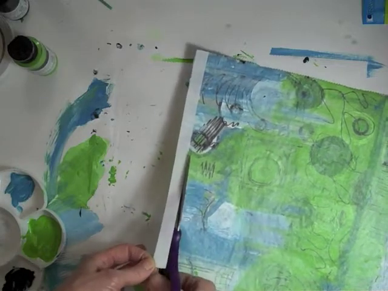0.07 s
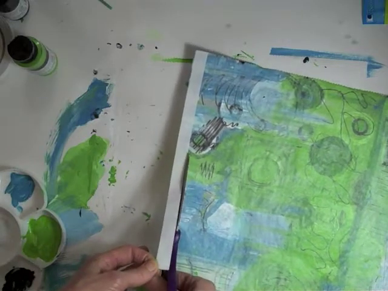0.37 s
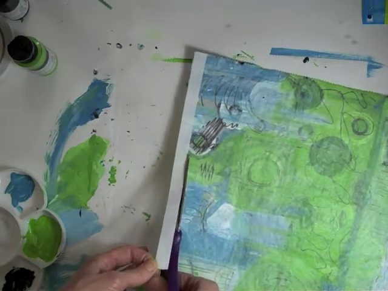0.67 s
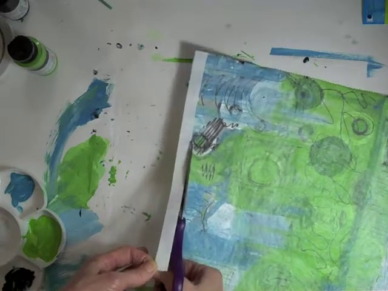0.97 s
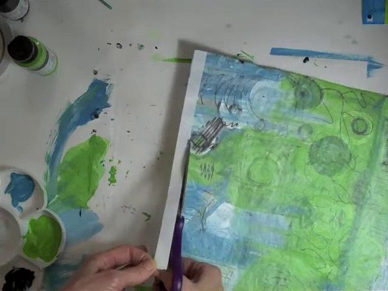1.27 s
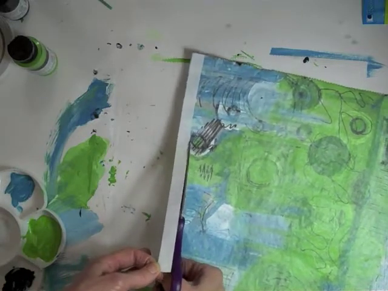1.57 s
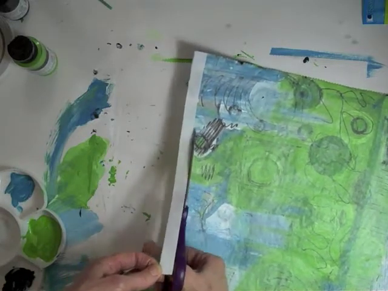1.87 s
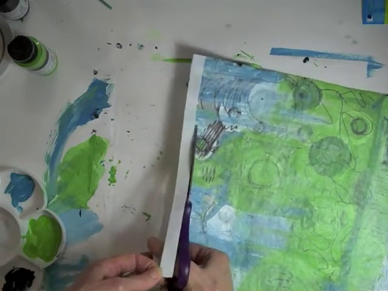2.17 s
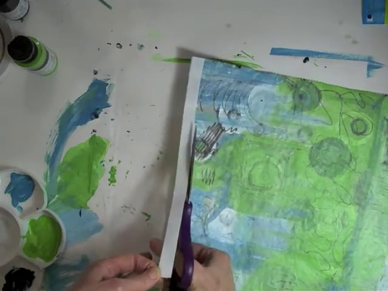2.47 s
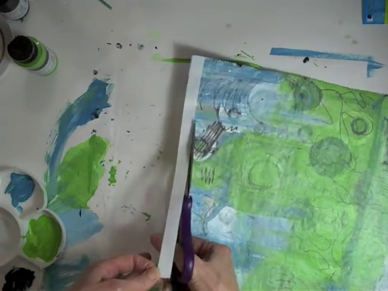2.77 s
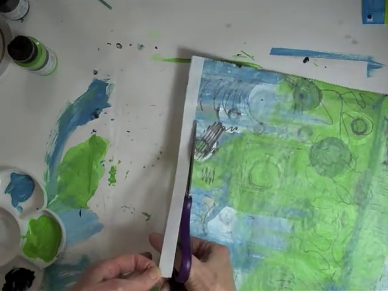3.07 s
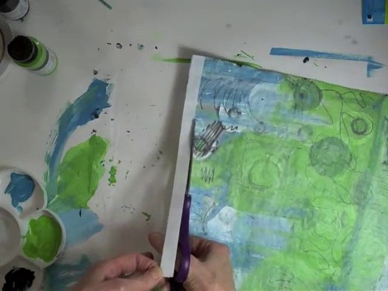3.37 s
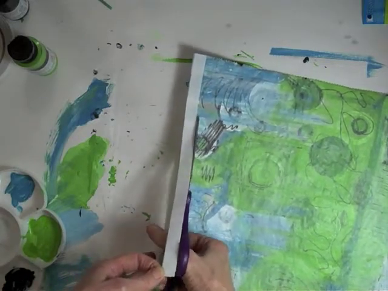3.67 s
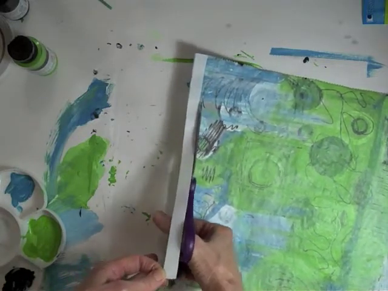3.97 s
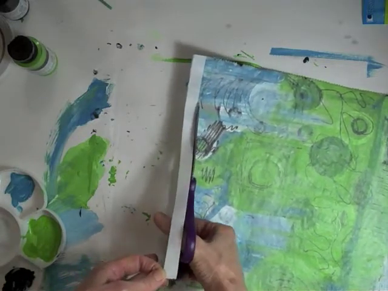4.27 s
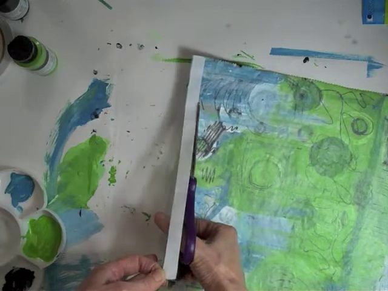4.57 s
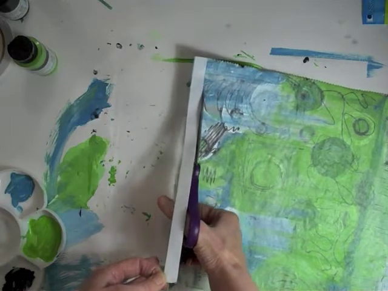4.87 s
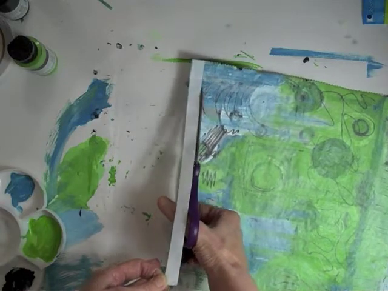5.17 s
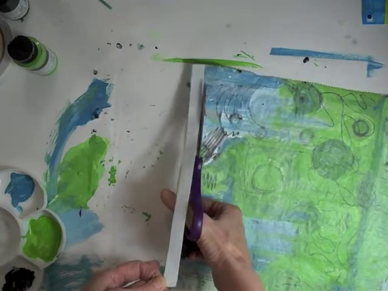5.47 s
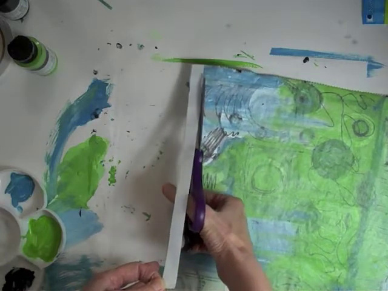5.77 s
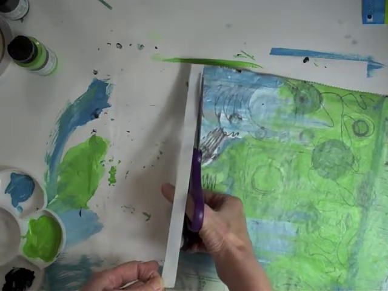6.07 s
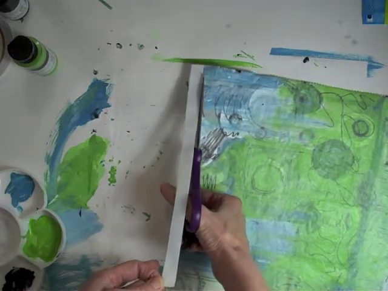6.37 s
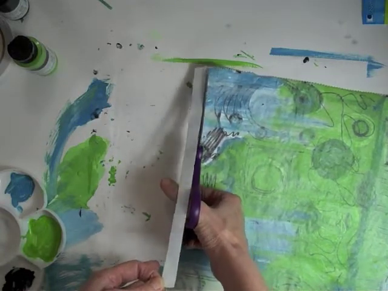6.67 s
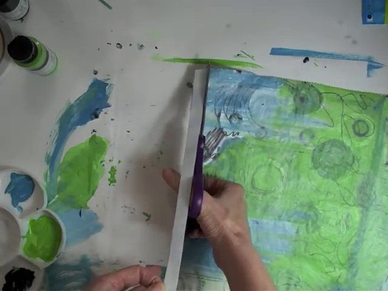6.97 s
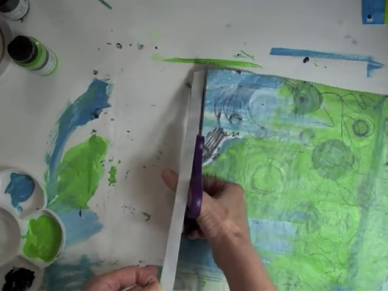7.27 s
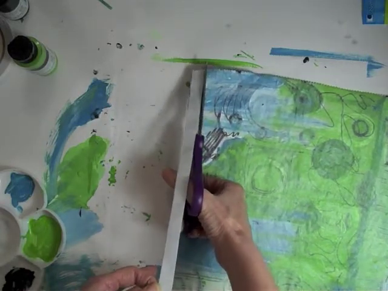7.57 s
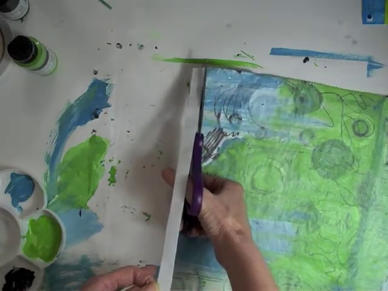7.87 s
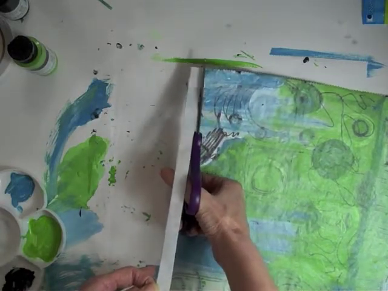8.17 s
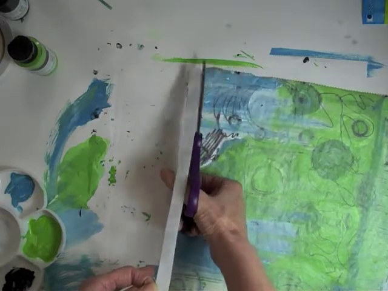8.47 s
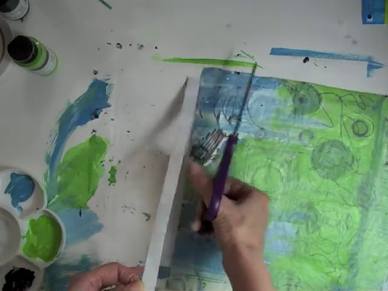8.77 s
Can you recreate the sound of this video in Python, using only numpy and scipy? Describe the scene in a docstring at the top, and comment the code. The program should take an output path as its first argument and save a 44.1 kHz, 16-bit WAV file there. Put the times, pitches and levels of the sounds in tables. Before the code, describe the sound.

Scissors cut slowly through a stiff painted sheet at a table, quiet and fairly close in stereo, with slight room reverberation and a faint steady hiss. Light scrapes and ticks lead to a first soft crunching cut at about 0.7 seconds. The open blades slide on, catching and squeaking, and close again at 1.7 seconds. The sheet rustles lightly until about 3.2 seconds, when scraping resumes. Further cuts come at 3.6, 4.6, 5.3 and 6.6 seconds, each preceded by dry rubbing and tiny squeaks and surrounded by crisp snaps of buckling paper. Each cut lasts about a third of a second, starting bright and turning hollow as it fades toward the blade tips; the last rings slightly higher. A small scrape at 7 seconds gives way to a lull. Around 8.3 seconds the blades scrape once more with a few clicks, and the paper rustles softly until nearly 9 seconds.

```python
"""A stiff painted sheet rustles and steel blades scrape its edge: scissors trim off a strip at a table.
Pushed along the cut, the open blades rub, catch and squeak by stick-slip friction. Six times they close
with a soft crunch of breaking fibres, which fades and turns hollow toward the tips as the resonances of
sheet and blades take over. The held sheet buckles with snaps and crackles. Two microphones pick up
the sound with the short reverberation of a quiet room, over a faint hiss."""
import sys
import numpy as np
from scipy import signal
from scipy.fft import rfft, irfft
from scipy.io import wavfile
from scipy.ndimage import uniform_filter1d, map_coordinates

SR = 44100
rng = np.random.default_rng(int(sys.argv[2]) if len(sys.argv) > 2 else 0)


def dump_mix(stems):
    """Bounce the given channels to the path in sys.argv[1] as a 16-bit WAV at rate SR."""
    frames = np.atleast_2d(stems).T  # one column per channel
    limited = np.clip(frames, -1, 1)  # hard clip at full scale
    pcm = np.round(limited * 32767).astype(np.int16)
    wavfile.write(sys.argv[1], SR, pcm)


N = 389667
HZ = np.fft.rfftfreq(2048, 1 / SR)

# Spectrum of parting fibres. Each row: frequency in Hz, relative spectral level in dB.
FRACTURE_SPECTRUM = [(100, -16), (400, -11.5), (1000, -9), (1500, -10), (2600, -9), (3250, -5),
                     (4000, -4.5), (4400, -2.5), (5300, -3.5), (6000, 0.5), (7100, 2), (8500, -7.5),
                     (11000, -20.5), (14500, -27)]
# Spectrum of rubbed paper. Each row: frequency in Hz, relative spectral level in dB.
FRICTION_SPECTRUM = [(100, -46), (500, -13.5), (1000, -7.5), (1600, -4), (2500, -7.5), (3200, -3.5),
                     (3900, -6.5), (4700, -2.5), (5400, -6), (6500, -0.5), (7500, -2.5), (9000, -13),
                     (11000, -19.5), (14500, -23.5)]
# The sheet's lowest mode rises as the uncut part shortens. Each row: time in seconds, frequency in Hz.
SHEET_MODE = [(0, 1640), (1.8, 1760), (3.8, 1710), (4.7, 1730), (5.5, 1810), (6.8, 2220), (8.4, 2190)]
# The open blades advance along the cut.
# Each row: start and length in seconds, level in dB, boosts of sheet resonance and treble fizz in dB.
PUSHES = [(0.227, 0.13, -54, 5, 8), (0.376, .075, -53, 1.5, 1.5), (0.482, 0.1, -55.5, -1.5, 1),
          (1.265, .13, -50.5, 3, 3.5), (1.403, 0.087, -52, 6, 2), (1.513, 0.047, -50, 7, 12.5),
          (1.655, 0.13, -49.5, 6.5, 3.5), (3.25, .19, -50.5, -1.5, -1.5), (3.465, 0.06, -51, -2, 7),
          (3.586, 0.047, -54, 7, 4), (4.27, 0.11, -50, 0.5, 0), (4.381, 0.052, -46, -6, 4.5),
          (4.549, 0.035, -54.5, 14, 4), (5.057, .12, -46.5, -0.5, 3.5), (6.338, 0.19, -49.5, 1, 4.5),
          (7.004, 0.066, -48.5, -3, 3.5), (8.299, 0.14, -50, -5, 9.5)]


def cut(start, hold_s, run_out_s, db, first_db, tips_db, blade_db):
    """Shear fracture: parting fibres excite sheet and blades, whose resonances gain toward the tips."""
    bite_s, grip_hz = .03, 27.8
    t = np.arange(-bite_s / 2, hold_s + run_out_s, 1 / SR)
    middle = start + t.mean()
    closed = np.clip(t / t[-1], 0, 1)
    breaks = fibre_impulses(len(t), per_s=9000, spread_db=3, clump_db=1.44, clump_hz=216.3)
    colour = spectrum(FRACTURE_SPECTRUM) + sheet_colour(middle, ring_db=.5)
    crunch = bending(breaks, colour, ripple_db=2.44)[:, :len(t)]
    # The resonances come and go as the sheet bends.
    sheet_db = first_db + (tips_db - first_db) * closed + 2 * wander(len(t), grip_hz)
    blades_db = blade_db + 2 * closed ** 2 + 2 * wander(len(t), grip_hz)
    sheet = resonance(crunch, sheet_mode_hz(middle), width_hz=500, boost_db=sheet_db)
    blades = resonance(crunch, 3270, width_hz=580, boost_db=blades_db)
    fizz = resonance(crunch, 9500, width_hz=5500, boost_db=2 - 1.5 * closed)  # brightest at the pivot
    sliding = np.clip(.5 - t / bite_s, 0, 1)  # falls to 0 as the blades bite
    run_out = np.maximum(t - hold_s, 0) / run_out_s
    force_db = db - 10 * sliding - 16.5 * run_out + .3 * wander(len(t), grip_hz)  # an uneven hand
    envelope = gain_of(force_db) * signal.windows.tukey(len(t), .04)
    return start + t[0], (crunch + sheet + blades + fizz) * envelope


def push(start, length, db, body_db, fizz_db):
    """Sliding friction: the open blades rub the cut edge in uneven fits."""
    envelope = swell(length, rise_s=.005, release_s=.0083)
    slips = envelope * fibre_impulses(len(envelope), per_s=3500, spread_db=3.5, clump_db=3,
                                      clump_hz=131.5)
    colour = friction_colour(start, body_db, squeak_db=4, fizz_db=fizz_db)
    return start, gain_of(db) * bending(slips, colour, ripple_db=3)


def scrape(start, length, db, squeak_db, release_s=.0032):
    """Stick-slip: a blade catches the edge and squeaks, with the body and fizz of the nearest push."""
    body_db, fizz_db = min(PUSHES, key=lambda row: abs(row[0] + row[1] / 2 - start))[-2:]
    t = np.arange(int(.09 * SR)) / SR
    rise_s = .22 * length
    envelope = np.minimum(t / rise_s, 1) * np.exp(-np.maximum(t - length - rise_s / 2, 0) / release_s)
    slips = envelope * fibre_impulses(len(t), per_s=5000, spread_db=3, clump_db=1.5, clump_hz=294)
    slips *= np.linalg.norm(envelope) / np.linalg.norm(slips)
    colour = friction_colour(start, body_db, squeak_db, fizz_db)
    return start - rise_s / 2, gain_of(db + 0) * radiate(slips, colour, ripple_db=2.5)


def snap(start, db, hz, t60):
    """Buckling: a crack and a damped rattle; large patches of paper sound low, small ones high."""
    t = np.arange(int(.05 * SR)) / SR
    rattle = rng.standard_normal(len(t)) * gain_of(-60 * t / t60)
    crack = gain_of(9) * (t == 0)
    octaves = .67 * min(1, (.012 / t60) ** .42)  # a longer ring is narrower
    colour = .94 * spectrum(FRICTION_SPECTRUM) + sheet_colour(start, ring_db=2, below_db=-2)
    colour += 16 * bell(hz, octaves)
    sound = radiate(rattle + crack, colour, ripple_db=1.9, echo_db=-12)
    return start, gain_of(db) * np.sqrt(.01 * SR) * sound / np.linalg.norm(sound)


def rustle(start, length, db, hz):
    """Crackling noise: the shifting sheet emits sparse clicks, strongest where the bent patch rings."""
    envelope = swell(length, rise_s=.011, release_s=.02)
    crackle = envelope * fibre_impulses(len(envelope), per_s=2700, spread_db=3, clump_db=2.5,
                                        clump_hz=94.4)
    paper = .5 * (spectrum(FRICTION_SPECTRUM) + spectrum(FRACTURE_SPECTRUM))
    colour = paper + sheet_colour(start, ring_db=4.5) + 6 * bell(hz, octaves=.54)
    return start, gain_of(db) * bending(crackle, colour, ripple_db=3)


def fibre_impulses(count, per_s, spread_db, clump_db, clump_hz):
    """Shot noise: tiny fibre breaks at random instants, their sizes swelling in clumps; rms 1."""
    breaks = rng.random(count) < per_s / SR
    size = np.minimum(rng.exponential(1, count), 4)
    sign = rng.choice([-1, 1], count)
    return unit_rms(breaks * sign * gain_of(spread_db * size + clump_db * wander(count, clump_hz)))


def friction_colour(time, body_db, squeak_db, fizz_db):
    """Friction spectrum of steel on paper in dB: rub, sheet resonance, narrow squeak and treble fizz."""
    squeak = squeak_db * bell(5720, octaves=.07)
    fizz = fizz_db * bell(10900, octaves=.98)
    return spectrum(FRICTION_SPECTRUM) + sheet_colour(time, body_db) + squeak + fizz


def sheet_mode_hz(time):
    """Natural frequency of the sheet's lowest mode at the given time."""
    return np.interp(time, *np.transpose(SHEET_MODE))


def sheet_colour(time, ring_db, below_db=-8):
    """Plate radiation in dB: the sheet rings at its lowest mode and radiates poorly below it."""
    hz = sheet_mode_hz(time)
    below_mode = .5 - .5 * np.tanh(np.log((HZ + 1) / (.78 * hz)) / .11)
    return below_db * below_mode + ring_db * bell(hz, octaves=.5)


def resonance(x, hz, width_hz, boost_db):
    """Second-order resonance: the band which, added to x, changes its level at hz by boost_db."""
    return (gain_of(boost_db) - 1) * signal.lfilter(*signal.iirpeak(hz, hz / width_hz, fs=SR), x)


def bending(x, colour_db, ripple_db, size=8192):
    """Time-varying response: peaks and dips move as the sheet bends, in overlapping windows."""
    hop = size // 2
    sound = np.zeros((2, len(x) + size))
    x = np.pad(x, (hop, size))
    for at in range(0, len(x) - size, hop):
        piece = radiate(x[at:at + size] * signal.windows.hann(size), colour_db, ripple_db)
        add(sound, (at - hop) / SR, piece if at else piece[:, hop:])
    return sound


def radiate(x, colour_db, ripple_db, echo_db=-9, echo_t60=.033):
    """Unit-energy response of one bend: its own peaks and dips, and early echoes to each microphone."""
    ripple = rng.standard_normal(len(HZ))
    ripple = unit_rms(uniform_filter1d(uniform_filter1d(ripple, size=12), size=8))
    t = np.arange(len(HZ)) / SR
    highpass = signal.butter(1, 1800, "highpass", fs=SR)  # small surfaces reflect only short waves
    echoes = signal.lfilter(*highpass, rng.standard_normal((2, len(t))))
    echoes *= gain_of(-60 * t / echo_t60) * (t > .0004)
    paths = (t == 0) + gain_of(echo_db) * unit_rms(echoes) / np.sqrt(len(t))
    sheet = minimum_phase(colour_db + ripple_db * ripple)
    responses = signal.fftconvolve(sheet[None], paths, axes=1)[:, :len(t)]
    return signal.fftconvolve(x[None], unit_rms(responses) / np.sqrt(len(t)), axes=1)


def room_path(x, side, tail_db=-15):
    """Reverberation: direct sound and a faint tail reach one microphone; side > 0 is the left."""
    # Decay of the room. Each row: frequency in Hz, time to fall 60 dB in seconds.
    decay_times = [(300, 0.14), (2000, 0.27), (6000, 0.3), (14000, 0.14)]
    # The left microphone is brighter. Each row: frequency in Hz, leftward bias in dB before weighting.
    left_bias = [(200, -7), (1500, 1), (3200, 1), (6000, 0), (7000, 9.5), (7800, 9), (10000, 15),
                 (14000, 36.5)]
    # The treble arrives out of step. Each row: frequency in Hz, left lead in radians before weighting.
    left_lead = [(5900, -0.38), (6900, 0.98), (8400, -1.43), (12000, -0.65)]
    t = np.arange(SR // 2) / SR
    hz, times, bands = signal.stft(rng.standard_normal(len(t)) * (t > .005), SR, nperseg=256)
    bands *= gain_of(-60 * times / spectrum(decay_times, hz)[:, None])
    tail = signal.istft(bands, SR, nperseg=256)[1][:len(t)]
    path = (t == 0) + gain_of(tail_db) * tail / np.linalg.norm(tail)
    lean = gain_of(side * spectrum(left_bias))
    response = 2 * lean / (1 + lean) * np.exp(.5j * side * spectrum(left_lead))
    microphone = np.fft.fftshift(irfft(response))[1:]
    return signal.fftconvolve(signal.fftconvolve(x, path)[:N], microphone, "same")


def hiss():
    """Stationary noise of room air and microphones: opposed in the deep bass, uncorrelated above."""
    # Noise spectrum in each microphone. Each row: frequency in Hz, relative spectral level in dB.
    left_spectrum = [(20, 3), (60, -2), (130, -1), (350, 0), (700, -1.5), (1500, -5), (3000, -9),
                     (6000, -12.5), (7400, -11), (9000, -14), (14500, -15.5)]
    right_spectrum = [(20, -1), (60, 1.5), (130, -8), (350, -8), (1000, -10), (3000, -12.5), (6000, -12.5),
                      (9000, -13.5), (14500, -13.5)]
    # Noise level in dB: left, then right.
    levels_db = [-58, -62]
    # Likeness of the channels. Each row: frequency in Hz, correlation from -1 to 1.
    likeness = [(25, -.85), (60, -0.65), (130, -0.47), (400, 0.018)]
    hz = np.fft.rfftfreq(N, 1 / SR)
    left, independent = rfft(rng.standard_normal((2, N)))
    correlation = spectrum(likeness, hz)
    right = correlation * left + np.sqrt(1 - correlation ** 2) * independent
    channels = zip((left, right), (left_spectrum, right_spectrum), levels_db)
    return np.array([gain_of(db) * unit_rms(irfft(noise * gain_of(spectrum(colour, hz)), N))
                     for noise, colour, db in channels])


def minimum_phase(db):
    """Causal impulse response with the given gain: it rings only after the blow."""
    log_gain = np.log(gain_of(np.r_[db, db[-2:0:-1]]))
    return np.fft.ifft(np.exp(np.conj(signal.hilbert(log_gain)))).real[:len(HZ)]


def swell(length, rise_s, release_s):
    """Envelope of a movement: linear rise, hold and exponential decay."""
    t = np.arange(0, length + .15, 1 / SR)
    return np.minimum(t / rise_s, 1) * np.exp(-np.maximum(t - length, 0) / release_s)


def wander(count, rate_hz):
    """Smooth random modulation of rms near 1."""
    position = np.arange(count) / SR * rate_hz
    return map_coordinates(rng.standard_normal(4096), [position], order=2, mode="wrap")


def spectrum(points, hz=HZ):
    """Interpolates a table on a log-frequency axis."""
    frequencies, values = np.transpose(points)
    return np.interp(np.log(hz + 1), np.log(frequencies + 1), values)


def bell(hz, octaves):
    """Gaussian peak of height 1 over log frequency."""
    return np.exp(-.5 * (np.log2((HZ + 1) / hz) / octaves) ** 2)


def gain_of(db):
    """Decibels to an amplitude ratio."""
    return 10 ** (np.asarray(db) / 20)


def unit_rms(x):
    """Scales to rms 1."""
    return x / np.sqrt(np.mean(x ** 2) + 1e-20)


def add(mix, start, sound):
    """Superposes a two-channel sound from start, in seconds."""
    part = mix[:, max(round(start * SR), 0):][:, :sound.shape[1]]
    part += sound[:, :part.shape[1]]


def scene():
    """Superposition: all paper sounds come from one spot on the table and share its room paths."""
    # The blades close. Each row: start, steady bite and run-out in seconds, level in dB,
    # boosts in dB of the sheet resonance at first and at the tips, and of the blade resonance.
    cuts = [(0.745, 0.13, 0.16, -46, 6.5, 9, 3), (1.69, 0.17, 0.22, -48, 4.5, 14.5, 9),
            (3.578, 0.2, 0.21, -45.5, 3.5, 16.5, 5.5), (4.559, 0.28, 0.096, -49.5, 0.5, 14.5, 3),
            (5.335, 0.13, 0.18, -47.5, 5, 9.5, 6.5), (6.6, 0.16, 0.195, -44, -10, 19, 3.5)]
    # A blade catches and slips. Each row: start and length in seconds, level and squeak boost in dB.
    scrapes = [(0.141, 0.0083, -46, -3), (0.23, 0.012, -47.5, -1), (0.311, .018, -49.5, 9),
               (0.379, 0.012, -43.5, -1), (0.402, 0.0097, -47, 23), (0.423, 0.014, -47.5, 17),
               (0.528, 0.015, -39.5, 12.5), (0.547, 0.018, -50, 5), (0.986, 0.03, -51.5, 32),
               (1.363, 0.029, -50.5, 5), (1.411, 0.0048, -40.5, 19), (1.427, 0.02, -52, 18),
               (1.462, .024, -41.5, 22), (1.498, 0.0066, -40, 15), (1.507, .042, -40, 9.5),
               (1.268, .019, -51, -4), (1.671, 0.029, -40.5, -5), (1.734, 0.012, -37.5, -7),
               (1.75, 0.0094, -39, 3), (2.787, 0.0091, -44.5, -5), (2.981, 0.0091, -52, -10),
               (3.012, 0.021, -47.5, -5), (3.174, 0.011, -43.5, 1), (3.294, 0.015, -38.5, 8),
               (3.321, 0.01, -45, 2), (3.343, 0.044, -46, 8), (3.402, 0.0069, -45, 0),
               (3.425, 0.0041, -39.5, 12), (3.467, 0.038, -43.5, 6), (3.6, 0.017, -39.5, 10),
               (4.274, .015, -33.5, 6), (4.297, 0.011, -43, 9), (4.343, .017, -38.5, 21),
               (4.379, 0.023, -35, 9), (4.406, .028, -38.5, 6), (4.563, .018, -43.5, 16),
               (5.064, .016, -41, 11), (5.088, .011, -46, 3), (5.112, 0.012, -36, 18),
               (5.129, .019, -43, 1), (5.149, 0.0084, -41, 7), (5.274, 0.0124, -45, 3),
               (5.295, 0.0097, -42, -7), (6.107, 0.0083, -52.5, 0), (6.339, 0.028, -47.5, 17),
               (6.393, 0.0084, -42, 9), (6.438, 0.011, -36.5, 9), (6.459, 0.0096, -35, 12),
               (7.029, 0.028, -46, 3), (8.311, .028, -45, 9), (8.357, 0.00805, -36, 5),
               (8.4, 0.0064, -46, 6), (8.421, .008, -38.5, 13), (8.588, 0.0079, -49, 3)]
    # The sheet buckles or slips off a blade. Each row: start in seconds,
    # level in dB (energy spread over 10 ms), centre in Hz, time to fall 60 dB in seconds.
    snaps = [(0.096, -52, 5470, 0.0035), (0.616, -54, 5530, .006), (0.553, -45, 6000, .004),
             (0.7052, -39.5, 3050, .003), (0.7425, -39, 4260, 0.0048), (1.002, -41, 6300, .004),
             (1.1786, -49.5, 4670, .007), (1.2818, -47, 5000, .004), (1.443, -34, 1660, 0.043),
             (1.691, -36, 5600, 0.011), (1.7123, -30, 6800, 0.0027), (2.056, -43.5, 2100, 0.0098),
             (2.094, -43.5, 2700, 0.0093), (3.4285, -41, 5530, 0.0099), (3.479, -34, 6650, 0.0069),
             (3.6554, -36.5, 5140, 0.0081), (3.72, -43.5, 5400, 0.0076), (4.2893, -34.5, 2190, 0.0059),
             (4.38, -30, 6940, 0.0037), (4.6161, -31.5, 3800, .004), (4.783, -35.5, 4540, 0.0086),
             (4.9396, -58, 6160, .006), (4.9605, -49, 6800, .007), (5.127, -38.5, 2780, .008),
             (5.148, -36.5, 3230, 0.0057), (5.325, -40.5, 3900, 0.0033), (5.445, -41.5, 6300, .007),
             (5.472, -31.5, 7450, 0.014), (6.4626, -39.5, 6000, .008), (6.515, -39.5, 5130, 0.006),
             (7.0311, -41.5, 6400, 0.0012), (7.5296, -61, 7000, .01), (7.7501, -62, 5400, .008),
             (8.205, -56, 4500, 0.01), (8.3576, -38, 6500, .006), (8.4295, -35.5, 5850, 0.0084),
             (8.489, -48.5, 2420, 0.01), (8.685, -52.5, 4160, 0.0089), (8.75, -54.5, 4360, 0.015)]
    # The sheet shifts in the hand and on the table.
    # Each row: start and length in seconds, level in dB, centre in Hz.
    rustles = [(0, 0.028, -50, 6200), (0.145, 0.049, -57, 6500), (0.594, 0.029, -62, 5500),
               (0.643, 0.067, -53, 3430), (1.021, .23, -59, 5400), (1.608, 0.04, -52.5, 2500),
               (2.045, 0.055, -59, 3000), (2.09, 0.08, -50.5, 6100), (2.262, .07, -50, 6300),
               (2.388, 0.029, -53.5, 2380), (2.455, 0.17, -57, 2870), (2.629, 0.03, -53, 5500),
               (3.178, 0.055, -52.5, 6000), (3.761, 0.035, -48.5, 1700), (4.409, 0.021, -46.5, 4400),
               (4.927, 0.12, -52, 6430), (5.17, 0.067, -55.5, 4500), (5.28, 0.047, -48, 3460),
               (5.732, .016, -58.5, 2780), (6.172, 0.22, -64.5, 6000), (6.761, 0.02, -44.5, 3200),
               (6.942, .06, -55.5, 5300), (7.461, 0.06, -72, 6000), (7.6, 0.097, -68.5, 4500),
               (8.294, 0.16, -55, 4330), (8.592, 0.15, -60, 4500), (8.779, .06, -53, 4540)]
    paper = np.zeros((2, N))
    add(paper, *rustle(0, N / SR, db=-74.5, hz=4500))  # the held sheet is never quite still
    sources = (cut, cuts), (push, PUSHES), (scrape, scrapes), (snap, snaps), (rustle, rustles)
    for source, rows in sources:
        for row in rows:
            add(paper, *source(*row))
    return np.array([room_path(paper[0], side=.54), room_path(paper[1], side=-1.48)]) + hiss()


def record(dry):
    """Band limiting: a steep low-pass at 14.4 kHz."""
    lowpass = signal.firwin(511, 14400, window=("kaiser", 9), fs=SR)
    return signal.oaconvolve(dry, lowpass[None], "same")


dry = scene()
out = record(dry)
dump_mix(out)
```